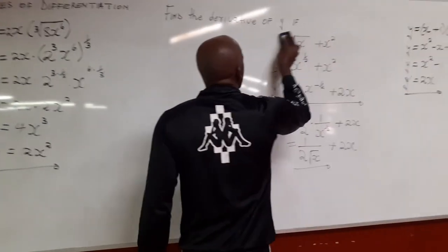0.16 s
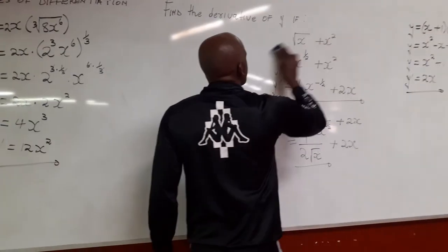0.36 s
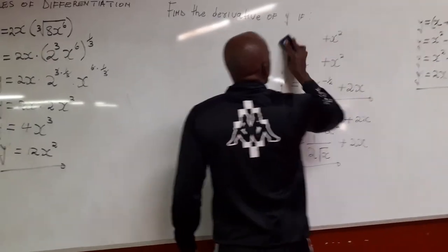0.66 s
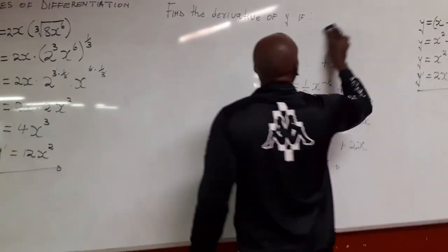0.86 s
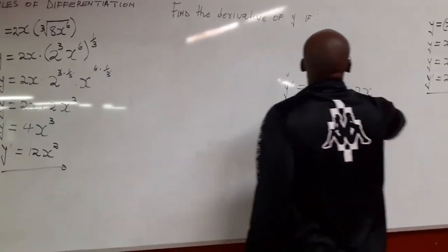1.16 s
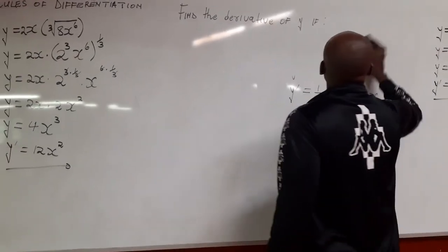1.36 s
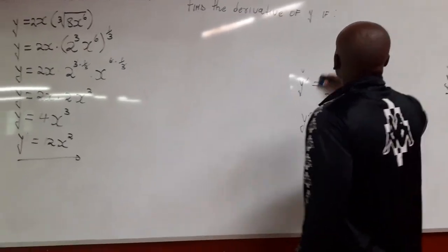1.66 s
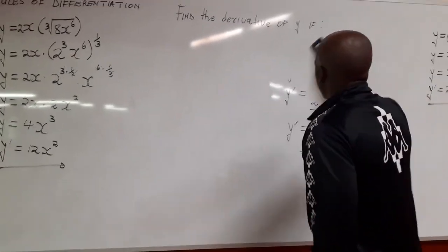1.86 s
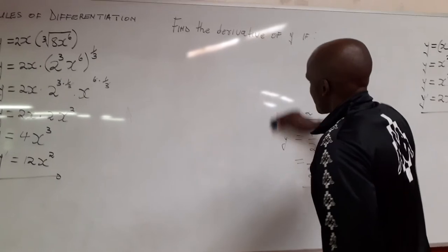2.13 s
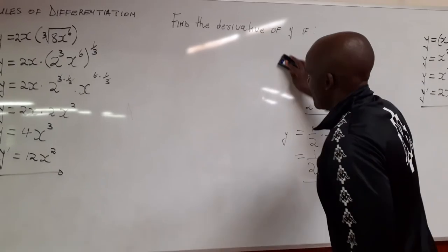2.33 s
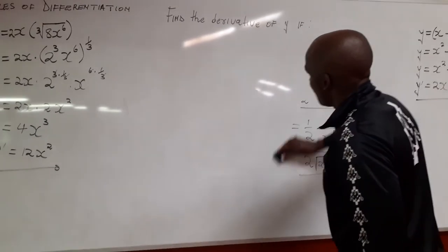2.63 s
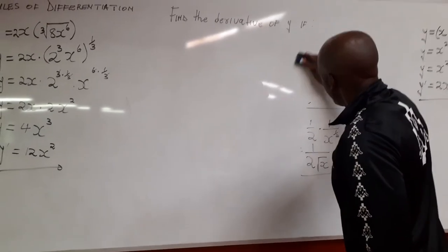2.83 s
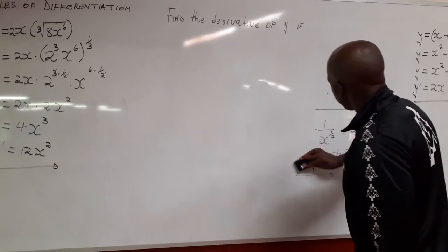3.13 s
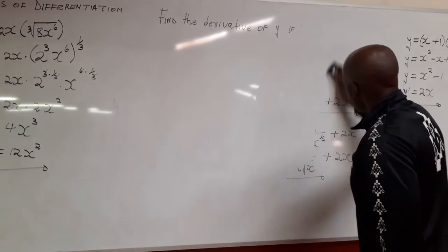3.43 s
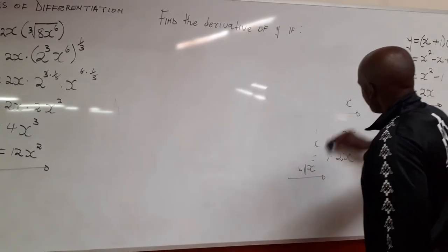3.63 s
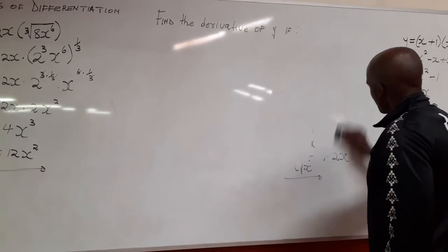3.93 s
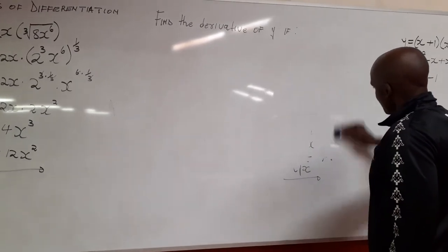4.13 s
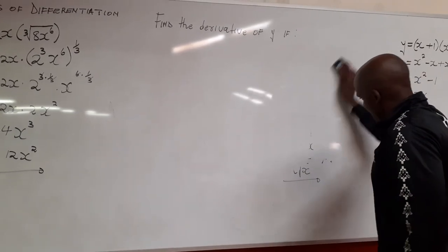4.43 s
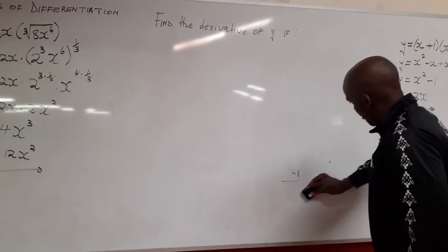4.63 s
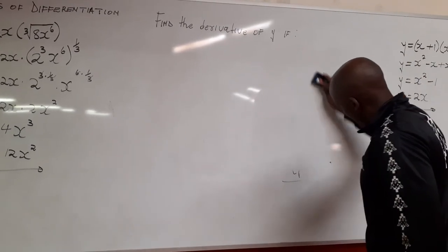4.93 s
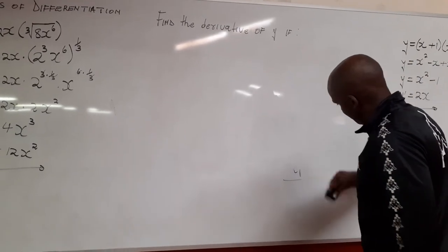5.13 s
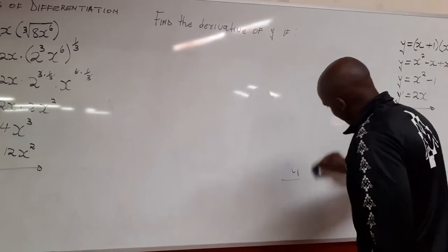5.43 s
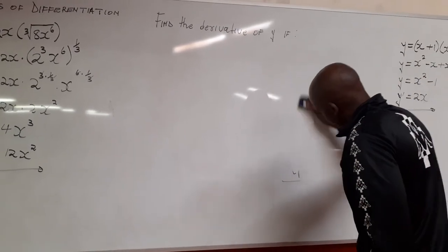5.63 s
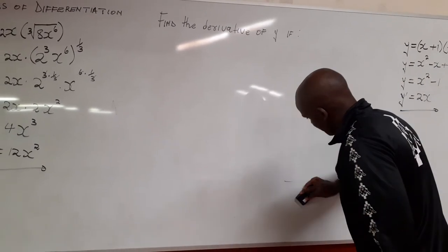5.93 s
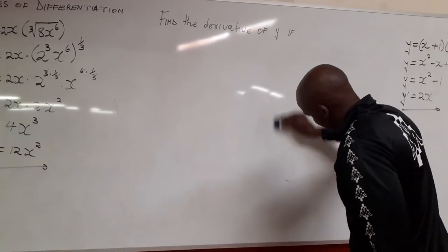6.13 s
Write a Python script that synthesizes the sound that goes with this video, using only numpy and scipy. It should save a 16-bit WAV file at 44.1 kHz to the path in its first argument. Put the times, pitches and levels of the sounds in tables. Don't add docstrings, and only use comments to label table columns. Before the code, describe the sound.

Loud handling thumps open over soft, hissing whiteboard wiping; shoes scrape and chirp faintly, with a low building rumble beneath.

```python
import sys
import numpy as np
from scipy import signal
from scipy.fft import rfft, irfft, next_fast_len
from scipy.io import wavfile
from scipy.ndimage import uniform_filter1d

SR = 44100
rng = np.random.default_rng(int(sys.argv[2]) if len(sys.argv) > 2 else 0)


def persist_wave(psi):
    counts = np.round(np.clip(psi, -1, 1) * 32767).astype(np.int16)
    wavfile.write(sys.argv[1], SR, np.atleast_2d(counts).T)


def ratio(d):
    e = np.asarray(d, float) / 20
    return 10 ** e


N = 277389

# turn t/s, level at the turn/dB, level at full speed/dB, peak position/share of stroke
STROKES = [(-.1, -54, -53.5, 0.4), (.185, -66, -64.5, .55), (.347, -66, -60, 0.48),
           (.574, -69, -62.5, 0.46), (0.764, -67, -57, 0.58), (1.043, -62.5, -62.5, 0.49),
           (1.267, -67, -63.5, 0.58), (1.462, -67.5, -60.5, 0.58), (1.694, -66, -62.5, 0.41),
           (1.896, -69, -62.5, 0.32), (2.168, -62, -62.5, 0.37), (2.36, -73, -57.5, 0.82),
           (2.54, -64, -52, 0.45), (2.8, -57, -59, 0.12), (2.962, -70, -60, 0.65), (3.203, -67, -62, 0.604),
           (3.475, -70, -63.5, 0.59), (3.654, -70.5, -64.5, 0.45), (3.876, -71, -63.5, 0.63),
           (4.076, -68.5, -65.5, 0.53), (4.36, -65, -50, 0.45), (4.705, -64, -64, 0.65),
           (4.961, -69, -63, 0.71), (5.178, -67, -65.5, 0.61), (5.373, -73, -67.5, 0.5),
           (5.512, -70, -65.5, 0.37), (5.773, -74.5, -60.5, 0.66), (5.999, -69, -63, 0.49),
           (6.29, -71.5, -64.5, 0.51), (6.5, -73, -65, .45)]
# f/Hz, level/dB
FELT = [(1200, -18), (2200, -9.5), (4500, -4.5), (5200, -0.5), (7000, -0.5), (8300, 3), (9200, -1),
        (10000, -9), (11000, -5), (12500, -1.5), (15700, -3), (15900, -52.5)]
# t/s, panel drumming level/dB, left port brightness level/dB
PLACE = [(0.0, 9.5, -10), (.5, 0.5, -24), (.9, -0.5, -18), (1.6, 4, 0.5), (2.2, 1.5, -6.5), (3.0, 7.5, -4),
         (3.4, -5, -2.5), (4.2, -5, -9), (4.5, 5, 1), (5.0, 0.5, -1.5), (5.6, -3.5, 1.5), (6.29, 3, -1.5)]
# f/Hz, level/dB
COVERED = [(60, -6), (300, -3), (1000, -4), (2500, -5.5), (4500, -4.5), (5500, -7), (7000, -14.5),
           (8500, -28), (9900, -15.5), (11000, -10), (12500, -7), (14000, -13), (15500, -19)]
# t/s, peak level/dB, extra swings/cycles, swing decay/ms, ring f/Hz
RAPS = [(0.1026, 2, 0.9, 0.85, 120), (.315, -15, 0.9, 1.5, 120), (.479, -13.5, 0.56, 1.3, 105),
        (0.8916, -11.5, 0.81, 1.16, 134), (1.1673, -20, 0.71, 1.9, 130), (1.4663, -28, 0.79, 1.53, 136),
        (1.602, -22, 0.76, 2.2, 90.4), (1.6244, -24, 0.25, 1.2, 106), (1.739, -45, 1, 0.68, 250),
        (1.8279, -36, 0.34, 1.6, 694), (1.935, -36.5, 0.92, 0.24, 94), (2.0593, -36.5, 0.48, 0.53, 134),
        (2.119, -32.5, .995, 4.2, 153), (2.525, -27.5, 0.68, 2.05, 102.6), (4.4032, -24.5, 0.39, 0.97, 132),
        (4.609, -26, 0.27, 1.2, 122), (5.932, -52, 0.92, 0.37, 920), (2.8208, -15, 0.05, 0.5, 120)]
# t/s, peak level/dB, rise/ms, ring f/Hz, t60/s
THUDS = [(0.066, -16.5, 2.7, 288, .02), (0.4795, -40, 1, 2050, 0.008), (.49, -30, 6, 68, .08),
         (2.17, -40, 6, 65, .07), (0.503, -21.5, 1.6, 93.5, 0.037), (0.522, -33, 3.3, 89.5, .035),
         (.622, -22.5, 5.5, 300, 0.021), (.624, -34.5, 3.3, 121, 0.033), (.335, -30, 3.5, 90, 0.036),
         (1.826, -29, 2.04, 330, 0.019), (0.65, -34.5, 2.5, 320, 0.018), (1.584, -40, 2, 322, 0.01),
         (1.602, -35, 2.7, 330, 0.041), (2.455, -38.5, 7.1, 330, 0.058), (2.483, -35, 3, 110, .03),
         (2.527, -42, 2.4, 320, 0.015), (2.602, -32.5, 2.3, 300, .025), (4.598, -32, 1.5, 138, 0.022),
         (4.627, -27.5, 1.5, 261, 0.0076), (5.931, -48.5, 1.5, 300, 0.027), (1.022, -28, 3.2, 85, 0.043),
         (2.451, -22.5, 15, 94.4, 0.05), (2.561, -41, 4.7, 84, 0.038), (2.675, -31, 1.9, 100, 0.047),
         (2.712, -36, 4, 99, 0.12), (2.846, -29, 2.8, 110, 0.033), (3.323, -41.5, 2.5, 131, 0.16),
         (3.422, -40.5, 2.17, 190, 0.12), (4.391, -28.5, 1.2, 153.5, 0.03), (2.8176, -9, .25, 850, .0062)]
# t/s, peak level/dB, length/ms, signed first swing/1, fizz level/dB
LEFT_TICKS = [(.875, -53, .2, 1, -20), (.92, -37.5, .12, 1, -26), (0.925, -32.5, 0.13, -1.06, -28),
              (.955, -34, 0.13, 1, -28), (.961, -34, 0.1, -1.2, -26), (1.262, -36, 0.12, 0.92, -32),
              (2.38, -65, .2, 1, -7.5), (2.06, -56, .1, 1, -8), (1.829, -30, .25, 1, -24),
              (5.933, -54.5, 0.14, 0.97, -15), (5.286, -69.5, 0.045, 1, -.5), (5.522, -61, 0.095, 1, -8),
              (2.49845, -35, .25, -1, -30)]
RIGHT_TICKS = [(.787, -57, 0.14, 0.77, -17), (1.8273, -20.5, 0.18, -0.83, -6),
               (1.8287, -40.5, .2, -0.96, 12.5), (1.9323, -27.5, 0.19, 0.93, -26),
               (2.0597, -35, 0.24, -1.1, -22), (2.0601, -39, .24, 1, -30), (5.135, -61, .2, 1, -15),
               (2.49815, -25.5, .16, -1, -10), (2.49845, -36, .16, 1, -30)]
# f/Hz, level/dB
PORT_RINGS = [(1500, -17), (4000, -5), (6000, -7), (8500, 0.5), (10500, -10), (12500, 8.5), (15000, -1)]
# t/s, length/s, first level/dB, change to the end/dB, tilt/(dB per octave)
RUBS = [(0.0, 0.11, -44, -1, -5), (0.105, 0.086, -24.5, -39.5, -5), (0.316, 0.012, -30.5, 0.5, -7),
        (0.353, 0.0064, -46.5, -6, -4), (0.48, 0.005, -33.5, -13.5, -1.5), (.498, .008, -51.5, -8, -1.5),
        (0.618, 0.056, -53.5, -4.5, -6), (0.889, 0.03, -41.5, 4, -5.5), (0.917, .065, -43, 1, -3.5),
        (0.982, 0.046, -48, -11, -5), (1.167, 0.04, -37, -10.5, -6.5), (1.206, 0.046, -47, 3.5, -4),
        (1.257, 0.053, -43, -11.5, -3.5), (1.47, 0.05, -44, -4, -4), (1.618, 0.15, -52.5, -8, -1.5),
        (1.772, 0.063, -56.5, 11, -5.5), (1.83, .06, -48.5, -10, -4.5), (1.932, 0.102, -49.5, -3.5, -8.5),
        (2.049, 0.12, -52.5, -6, -5), (2.637, 0.066, -58, 16, -9), (2.665, 0.15, -49.5, -7, -4),
        (2.808, 0.055, -40, -2, -5.5), (2.877, 0.094, -43, -4, -5), (3.32, 0.083, -49, -2, -13.5),
        (3.41, 0.03, -48, 0, -15), (4.598, .14, -43.5, -13.5, -10.5)]
# f/Hz, width/octaves, level/dB
CASE_RINGS = [(330, 0.35, 4.5), (900, 0.3, 6), (1900, .15, 4.5), (2688, 0.2, 3)]
# t/s, level/dB
GRIP = [(0.0, -46), (.3, -56), (.7, -60.5), (.85, -66.5), (1.1, -62.5), (1.4, -68), (1.7, -56.5),
        (2.2, -68.5), (2.4, -66), (2.55, -57), (3.0, -69.5), (3.6, -64), (4.3, -84), (4.45, -59),
        (4.55, -64.5), (4.8, -74), (6.29, -88)]
# t/s, length/s, level/dB, first f/Hz, last f/Hz
SQUEAKS = [(0.398, .07, -71, 2030, 1970), (1.46, .04, -75, 1690, 1604), (1.482, .05, -74, 3480, 3570),
           (1.63, 0.056, -71, 2830, 2900), (5.68, 0.014, -76, 2580, 2650), (2.199, 0.14, -84, 2580, 2640),
           (4.57, .16, -67, 2540, 2530)]
SHUFFLES = [(0.783, 0.037, -62.5, 1900, 1840), (1.013, 0.092, -59.5, 2000, 1720),
            (1.059, 0.027, -62, 2950, 2600), (3.397, 0.1, -65.5, 814, 845), (3.415, 0.065, -54, 435, 435),
            (3.55, 0.18, -62.5, 467, 460), (3.57, 0.18, -74, 800, 761), (3.31, .09, -68.5, 783, 800),
            (4.427, 0.16, -59.5, 770, 796)]
SCRAPES = [(0.0, 0.055, -46, 1900, 1790), (2.061, 0.11, -53, 2098, 2840), (2.6, 0.18, -47, 1140, 1540),
           (4.401, 0.23, -50.5, 2030, 2700), (4.551, 0.27, -65, 3994, 3720),
           (5.918, .13, -75.5, 1500, 1513), (3.55, .2, -75.5, 1302, 1300)]
NEAR_SLIDE = [
    (5.618, .028, -62, 689, 730),
    (5.632, .04, -56, 650, 750),
    (5.642, .05, -59, 848, 1130),
    (5.66, .035, -64, 600, 560),
    (5.68, .08, -78.5, 1085, 1140),
]
DRAGS = [(4.56, 0.24, -71.5, 2500, 2540), (4.65, 0.15, -73, 1660, 1960), (4.78, .25, -76.5, 2100, 2450),
         (4.74, .2, -68, 2400, 2560), (5.3, 0.27, -81.5, 2600, 2360), (4.5, 0.13, -81, 1900, 1660),
         (2.6, 0.28, -63.5, 1490, 1530), (2.7, 0.22, -68, 1140, 1080), (3.55, 0.19, -64.5, 1160, 1175),
         (3.69, 0.11, -68, 1160, 1130), (3.55, .24, -69, 1520, 1460), (3.56, .22, -74, 1750, 1600),
         (3.57, 0.081, -75.5, 2180, 2200), (4.44, 0.16, -54.5, 2320, 2330), (4.46, 0.15, -58, 1730, 1780),
         (1.5, 0.17, -72, 2540, 1940), (1.3, .09, -74, 1300, 1400), (2.75, 0.22, -61.5, 2500, 2440)]
CHIRPS = [(.326, .045, -60, 2330, 2200), (.352, .045, -59, 2250, 1760), (.385, .075, -63, 1800, 1720),
          (.37, .05, -63, 2200, 2130), (1.53, .035, -69, 4050, 3800), (1.563, .032, -70, 3080, 2800),
          (1.578, .04, -73, 2750, 2150), (1.565, .045, -74, 3900, 4020)]
# width/share of f, echo level/dB, stutter/dB
SOLES = [(0.078, -0.5, 0.5), (0.32, -5, 1), (1, -5, 1), (0.31, -25, 5.5), (0.14, -9.5, 1.5),
         (0.057, -0.5, 0)]
# f/Hz, t60/s
ROOM = [(250, 1.2), (1000, 1.0), (2500, .85), (5000, .6), (10000, .4)]
# t/s, level/dB
BUSTLE = [(0.0, -40.5), (.2, -56), (.55, -60.5), (.7, -64.5), (1.5, -74.5), (1.62, -63.5), (1.98, -61),
          (2.08, -56), (2.33, -76.5), (2.55, -64.5), (2.76, -42), (3.15, -63.5), (3.72, -65.5), (4.15, -80),
          (4.56, -58), (4.76, -74), (5.7, -72), (6.29, -77.5)]
# f/Hz, level/dB
HALL_COLOURS = [
    [(20, -19.5), (60, -1), (85, -7), (150, -51.5)],
    [(60, -40), (96, 3.5), (105, -1.5), (115, 2), (180, -49)],
    [(100, -42), (150, -6), (165, 1), (225, -8), (300, -46.5)],
    [(120, -36), (250, -7.5), (330, 2), (440, -6.5), (560, -15), (800, -14.5), (1200, -24.5), (3000, -30.5),
     (9000, -52.5)],
]
# level at rest/dB, share of the bustle followed/1
HALL_REST = [(-83.5, .1), (-70, .15), (-75, 0.19), (-68.5, 0.89)]
# middle t/s, length/s, top level/dB
TRAFFIC = [(.17, 0.54, -57), (1.228, 0.17, -62.5), (1.63, .25, -62.5), (2.135, .15, -61.5),
           (2.35, 0.35, -68), (2.993, 0.94, -69.5), (3.649, 0.78, -65.5), (4.56, 0.44, -61),
           (5.631, 0.35, -63), (5.96, 0.53, -63.5)]
HUMS = [(1.24, 0.46, -58), (1.5, .3, -61.5), (2.09, 0.19, -55.5), (2.82, 0.41, -54.5), (3.149, 0.3, -56),
        (3.65, 0.58, -59.5), (4.45, 0.12, -57), (5.35, 0.47, -58), (4.28, 0.16, -67), (5.75, 0.75, -67.5)]
UPPER_HUMS = [(.18, 0.22, -55.5), (.45, 0.12, -61.5), (0.687, 0.29, -67.5), (2.1, 0.22, -67),
              (2.65, 0.74, -61.5), (4.5, 0.33, -77), (5.349, 0.82, -72.5)]

HZ = np.fft.rfftfreq(512, 1 / SR)[:, None]
FRAMES = np.arange(N // 128 + 5) * 128 / SR


def evened(x):
    return x / np.sqrt(np.mean(x ** 2) + 1e-20)


def read(points, hz):
    f, value = np.transpose(points)
    return np.interp(np.log(hz + 1), np.log(f + 1), value)


def add(mix, s, sound):
    part = mix[round(s * SR):][:len(sound)]
    part += sound[:len(part)]


def coloured(x, points):
    n = next_fast_len(x.shape[-1])
    response = ratio(read(points, np.fft.rfftfreq(n, 1 / SR)))
    return irfft(rfft(x, n) * response, n)[..., :x.shape[-1]]


def at_samples(values):
    return np.interp(np.arange(N) / SR, FRAMES, values)


def curve(rows, axis):
    rows = np.array(rows)
    return np.interp(np.arange(N) / SR, rows[:, 0], rows[:, axis])


def flutter(hz):
    width = int(SR / hz)
    return evened(uniform_filter1d(uniform_filter1d(rng.standard_normal((2, N)), width), width))


def eraser():
    hiss = evened(coloured(rng.standard_normal((2, N)), [(600, -45), *FELT]))
    panel = coloured(hiss, [(4600, 0), (5200, -60)])
    air = coloured(hiss[1], [(9000, -60), (9600, 0)])
    stroke_db, speed = strokes()
    shaded_db = curve(PLACE, axis=2) + 0.3 * (stroke_db + 63)
    felt = (hiss - panel) * ratio([shaded_db, 0 * shaded_db])
    air_db = -3 * (1 - speed) ** 2 + 0.8
    felt[1] += air * (ratio(air_db) - 1)
    patchy = panel * ratio(curve(PLACE, axis=1) + 2.9 * flutter(hz=10))
    return (felt + patchy) * ratio(stroke_db - 0.02 + 1.1 * flutter(hz=60.03))


def strokes():
    turn_s, turn_db, full_db, lean = np.transpose(STROKES)
    place = np.interp(FRAMES, turn_s, np.arange(len(turn_s)))
    k = place.astype(int)
    skew = np.log(0.5) / np.log(np.clip(lean[k], 0.1, 0.9))
    speed = np.sin(np.pi * (place % 1) ** skew) ** 1.6
    slow_db = np.interp(FRAMES, turn_s, turn_db)
    stroke_db = slow_db + (full_db[k] - slow_db) * speed
    return at_samples(stroke_db), at_samples(speed)


def knocks():
    out, t = np.zeros(N), np.arange(6000) / SR
    raps = [(*row, (2.4 - 0.1943 * row[1]) / row[4]) for row in RAPS]
    thuds = [(s, db, 0.2, *rest) for s, db, *rest in THUDS]
    rattle_colour = [(150, -18.5), (500, 2), (1200, -8.5), (3000, -20.5), (6000, -49)]
    for s, db, swings, ms, ring_hz, t60 in raps + thuds:
        sharp = np.exp(-1000 * t / ms)
        rise = 1 - sharp ** 1.6
        cycles = ring_hz * t + swings * (1 - sharp)
        ring = np.sin(2 * np.pi * cycles) * (1 + 3.98 * swings * sharp)
        ring *= ratio(-60 * (t / t60) ** 2)
        rattle = evened(coloured(rng.standard_normal(len(t)), rattle_colour))
        rattle *= swings * ratio(-17.5 - 60 * t / 0.06)
        add(out, s, ratio(db - 8) * rise * (ring + rattle))
    return out


def ticks():
    out, spit, t = np.zeros((2, N)), np.zeros((2, N)), np.arange(300) / SR
    for port, rows in enumerate((LEFT_TICKS, RIGHT_TICKS)):
        for s, db, ms, direction, fizz_db in rows:
            u = 1000 * t / ms - 2.6
            late = np.maximum(u, 0)
            snap = -2.3 * direction * u * np.exp(-u ** 2 / (1 + 0.52 * late)) / (1 + 1.15 * late)
            add(out[port], s, ratio(db) * snap)
            crack = 2.5 * (t == t[np.argmin(abs(u + 0.6))])
            fizz = 0.55 * rng.standard_normal(len(t)) * np.exp(-(u + 0.28) ** 2 / 0.87)
            add(spit[port], s, ratio(db + fizz_db + 3.5) * (fizz - crack))
    out[0] = coloured(out[0], [(4500, 0.5), (8000, -22)])
    return out + coloured(spit, PORT_RINGS)


def rubs():
    grit = rng.standard_normal(N) * ratio(1.7 * flutter(hz=400)[0])
    z = signal.stft(grit, nperseg=512, noverlap=384)[2]
    t, octaves = FRAMES[:z.shape[1]], np.log2(np.maximum(HZ, 320) / 500)
    start, length, *_, bright = np.transpose(RUBS)
    tilt = np.interp(t, start + length / 2, bright)
    rings_db = sum(db * np.exp(-(np.log2((HZ + 1) / hz) / width) ** 2) for hz, width, db in CASE_RINGS)
    treble_loss_db = 5.3 * np.maximum(octaves - 2.2, 0) ** 2
    shape = ratio(tilt * octaves - treble_loss_db + 6.9 * (HZ < 150) + rings_db)
    shape /= np.sqrt(np.mean(shape ** 2, axis=0))
    level, since = np.zeros(N), np.arange(SR // 2) / SR
    attack_s, release_db_per_s = 0.0043, 1298.5
    for s, length, db, change_db, _ in RUBS:
        held_db = db + change_db * np.minimum(since / length, 1)
        held_db -= release_db_per_s * np.maximum(since - length, 0)
        add(level, s, np.minimum(since / attack_s, 1) * ratio(held_db))
    return level * evened(signal.istft(z * shape, nperseg=512, noverlap=384)[1][:N])


def grip():
    colour = [(40, -6.5), (100, 5), (200, -8.5), (350, -4.5), (500, -17), (1000, -41)]
    thud = evened(coloured(rng.standard_normal(N), colour))
    return thud * ratio(curve(GRIP, axis=1) + 4.5 * flutter(hz=40)[0])


def shoes():
    dry, wet = np.zeros((2, N)), np.zeros(N)
    kinds = zip((SQUEAKS, SHUFFLES, SCRAPES, NEAR_SLIDE, DRAGS, CHIRPS), SOLES)
    for rows, (width, echo_db, stutter_db) in kinds:
        for s, length, db, first_hz, last_hz in rows:
            n = round(length * SR)
            turn = np.exp(2j * np.pi * np.cumsum(np.linspace(first_hz, last_hz, n)) / SR)
            r = np.exp(-np.pi * width * np.sqrt(first_hz * last_hz) / SR)
            stutter = evened(uniform_filter1d(rng.standard_normal(n), int(0.003 * SR)))
            drive = ratio(stutter_db * stutter) * rng.standard_normal((2, n))
            band = (turn * signal.lfilter([1], np.poly([r, r]), drive / turn)).real
            scuff = ratio(db) * evened(band) * signal.windows.tukey(n, 0.85)
            add(dry.T, s, scuff.T)
            add(wet, s, ratio(echo_db) * scuff[0])
    return dry + echo(wet)


def echo(x):
    hz, t, z = signal.stft(rng.standard_normal((2, SR)), SR, nperseg=256)
    decay = ratio(-60 * t / read(ROOM, hz)[:, None])
    tail = signal.istft(z * decay, SR, nperseg=256)[1]
    return signal.fftconvolve(x[None], tail / np.linalg.norm(tail[0]), axes=1)[:, :N]


def hall():
    bustle_db = curve(BUSTLE, axis=1) + 70
    out = np.zeros((2, N))
    layers = zip(HALL_COLOURS, HALL_REST, (TRAFFIC, HUMS, UPPER_HUMS, []))
    for colour, (rest_db, share), rows in layers:
        level = ratio(rest_db + share * bustle_db) + swells(rows)
        noise = evened(coloured(rng.standard_normal((2, N)), colour))
        out += noise * level * ratio(1.5 * flutter(hz=9))
    return out


def swells(rows):
    bells = 0 * FRAMES
    for s, length, db in rows:
        bells = bells + ratio(db - 20 * (2 * (FRAMES - s) / length) ** 2)
    return at_samples(bells)


def scene():
    left, right = eraser() + hall() + shoes()
    case = signal.butter(2, 3220, fs=SR, output="sos")
    handling = signal.sosfilt(case, knocks() + rubs() + grip())
    return np.array([coloured(left, COVERED) + handling, right]) + ticks()


def roll_off(x):
    return signal.sosfilt(signal.butter(12, 15830, fs=SR, output="sos"), x)


def record(dry):
    rumble_filter = signal.butter(4, 50, "high", fs=SR, output="sos")
    mix = np.clip(signal.sosfilt(rumble_filter, dry), -1, 1)
    return roll_off(mix)


dry = scene()
out = record(dry)
persist_wave(out)
```